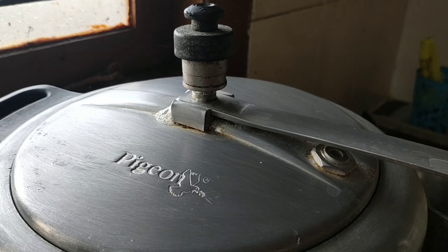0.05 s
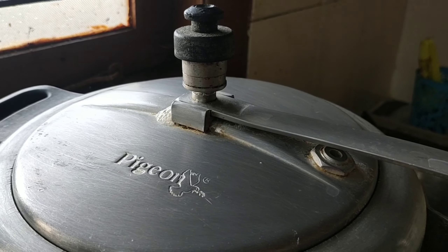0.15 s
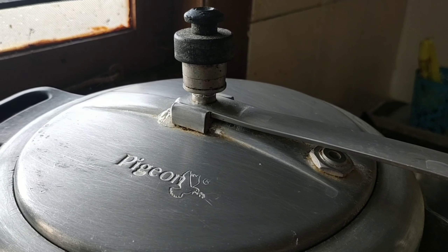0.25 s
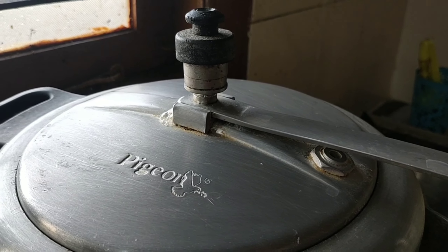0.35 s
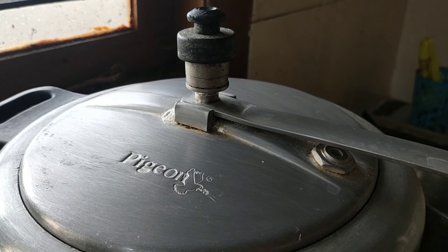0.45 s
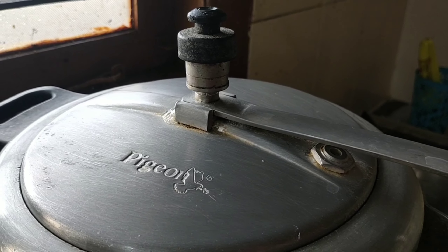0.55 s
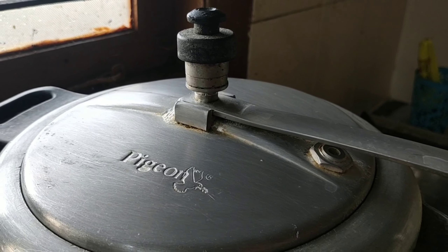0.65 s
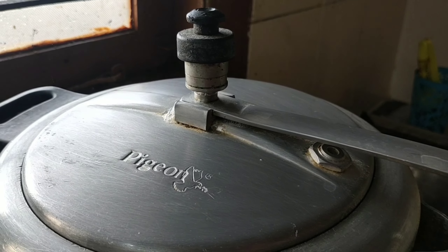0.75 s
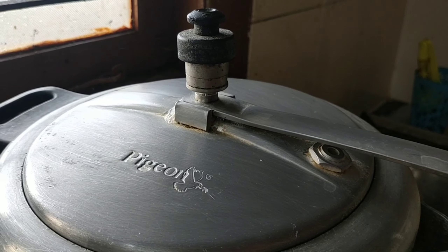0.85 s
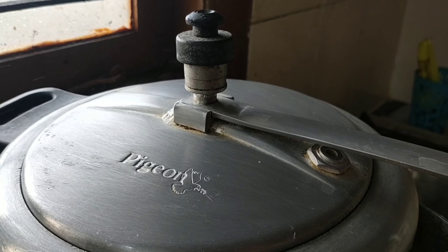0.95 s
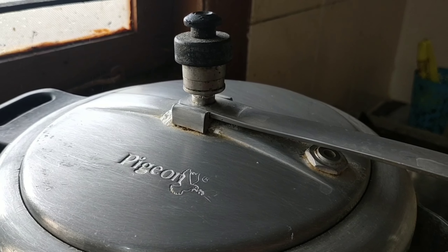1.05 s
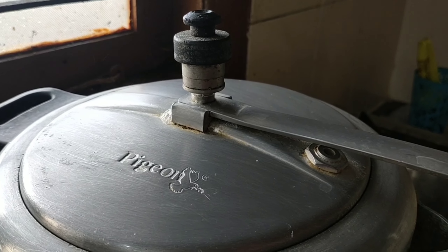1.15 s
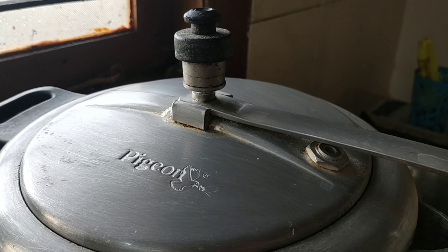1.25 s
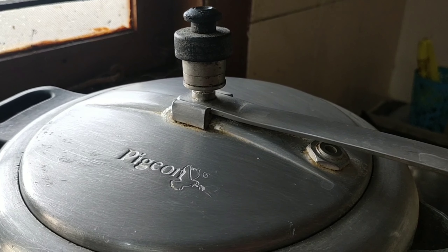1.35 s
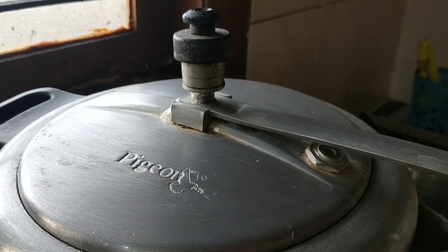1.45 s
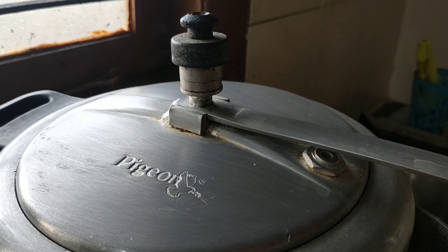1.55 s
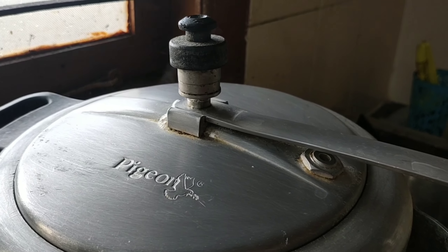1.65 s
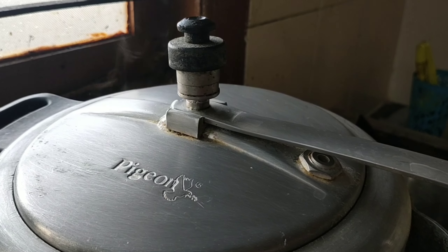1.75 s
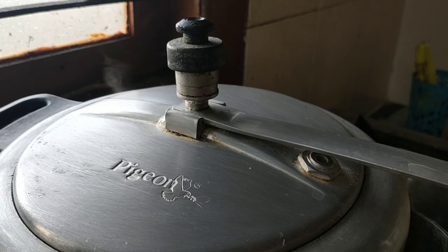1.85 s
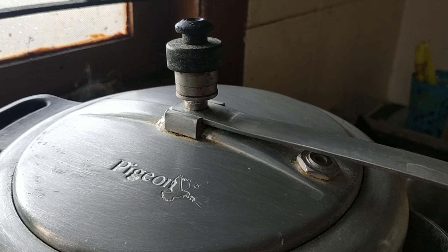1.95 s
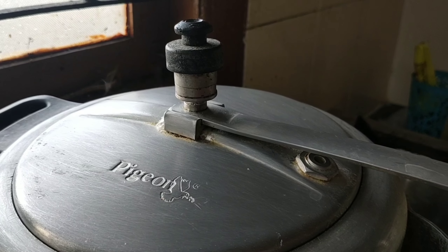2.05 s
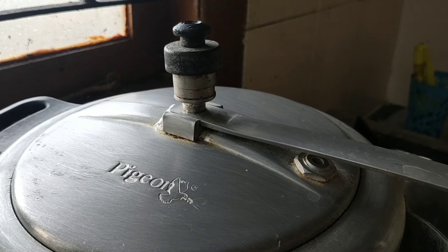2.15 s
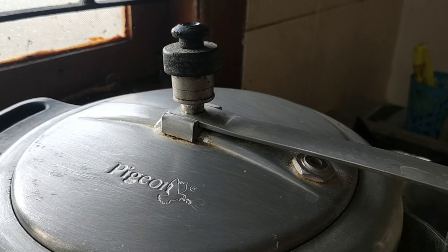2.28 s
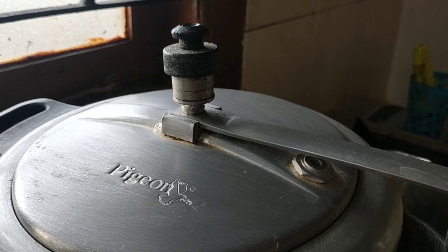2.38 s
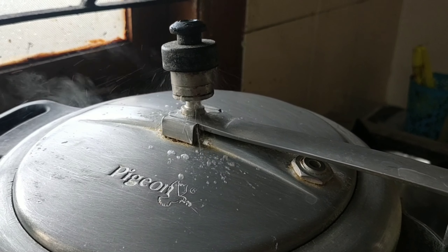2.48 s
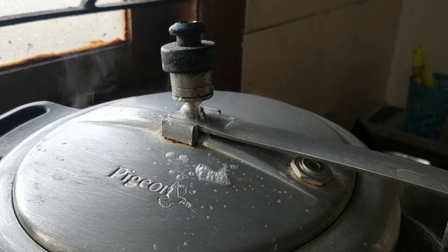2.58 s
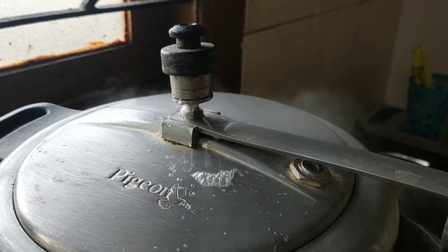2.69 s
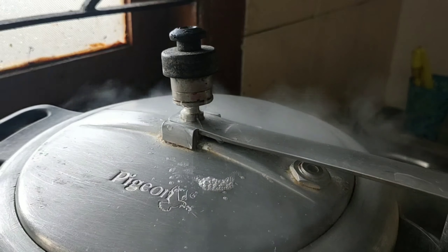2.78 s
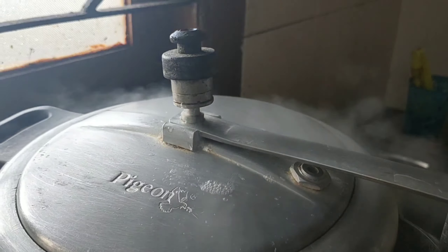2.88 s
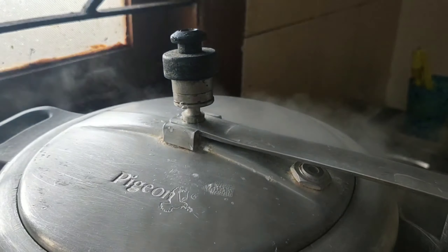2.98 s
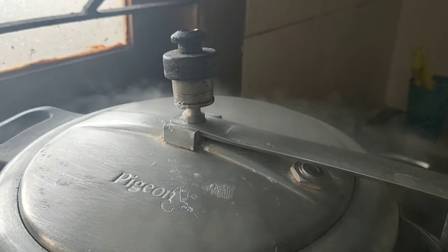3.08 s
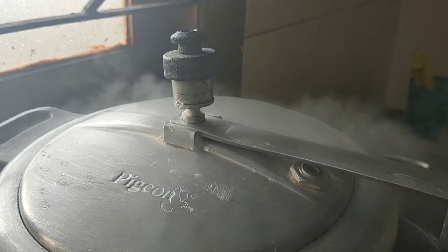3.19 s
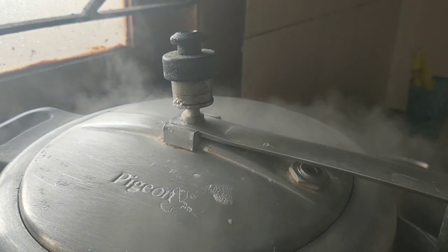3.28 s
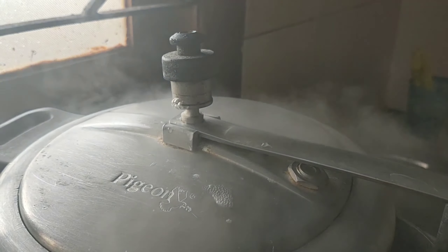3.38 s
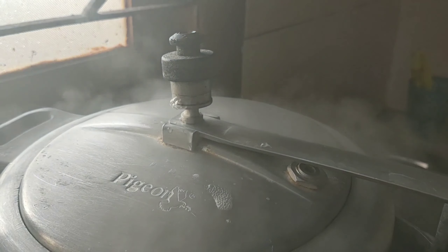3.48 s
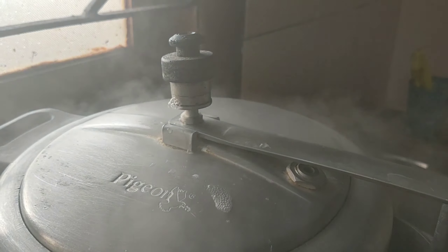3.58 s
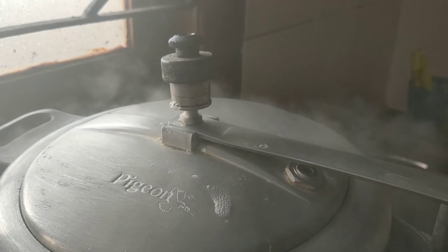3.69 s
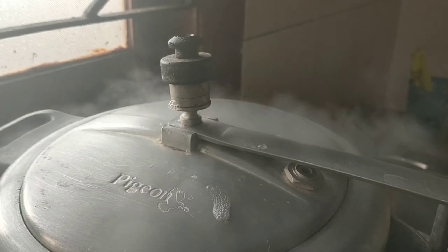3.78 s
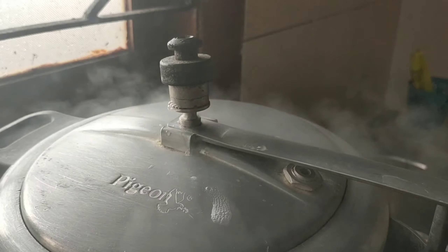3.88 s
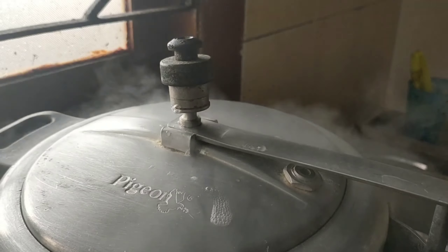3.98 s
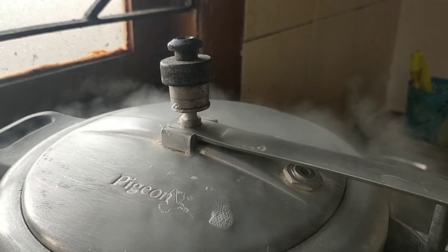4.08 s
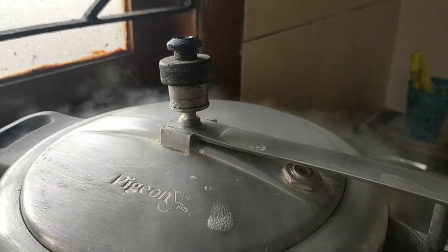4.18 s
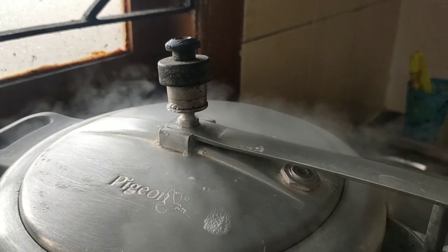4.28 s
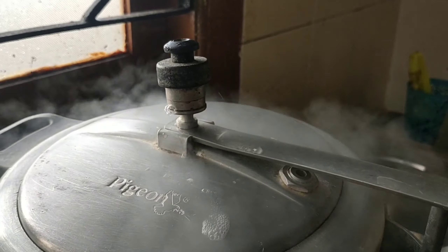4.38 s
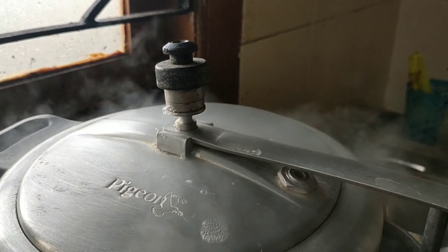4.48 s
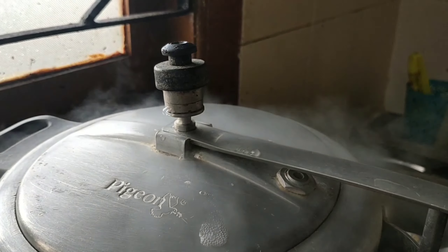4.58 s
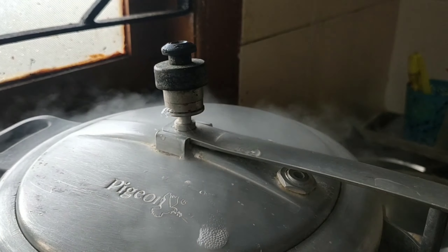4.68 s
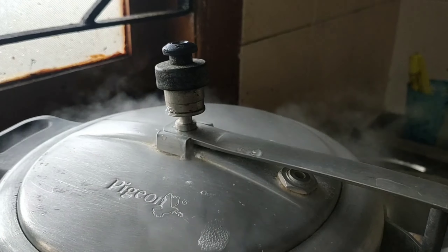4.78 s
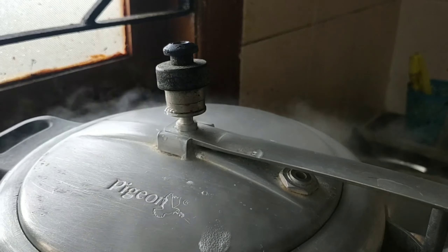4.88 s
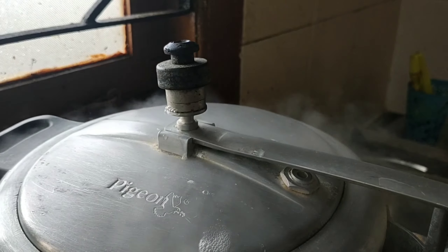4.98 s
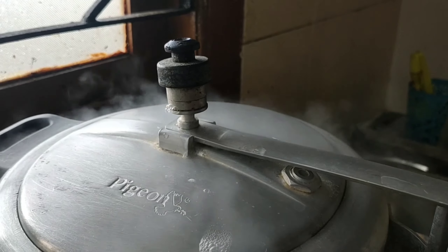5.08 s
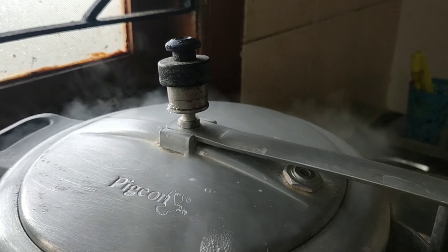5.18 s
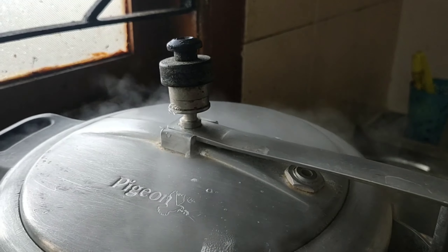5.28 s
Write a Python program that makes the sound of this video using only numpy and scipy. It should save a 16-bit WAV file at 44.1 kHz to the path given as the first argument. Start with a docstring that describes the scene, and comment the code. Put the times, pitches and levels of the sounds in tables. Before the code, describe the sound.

A pressure cooker hisses faintly on a gas stove, then suddenly releases a loud, steady, bright blast of steam.

```python
"""A pressure cooker simmers on a gas ring in a kitchen, over a faint motor hum.
Steam seeps past the weight valve, half whistling and spitting as the pressure grows.
At 2.5 s the weight lifts: a short throaty rush, then a loud, bright, steady jet from the vent.
From 2.6 s the steam cloud reaches the microphone and buffets it with dull pops."""
import sys
import numpy as np
from scipy import signal
from scipy.fft import rfft, irfft, next_fast_len
from scipy.io import wavfile

SR = 44100
rng = np.random.default_rng(int(sys.argv[2]) if len(sys.argv) > 2 else 0)


def inscribe(sig):
    """Save sig as 16-bit PCM at rate SR to the path in sys.argv[1].

    A 1-D sig is mono; a 2-D sig holds one channel per row.
    Samples are clipped to [-1, 1] before scaling.
    """
    pcm = np.round(np.clip(np.atleast_2d(sig).T, -1, 1) * 32767)
    wavfile.write(sys.argv[1], SR, pcm.astype(np.int16))


N = 235641
TIME_S = np.arange(N) / SR
FFT_SIZE = next_fast_len(N, True)
FREQ_HZ = np.maximum(np.arange(FFT_SIZE // 2 + 1) * SR / FFT_SIZE, 1)
OPEN_S, JET_RISE_DB_PER_S = 2.519, 450   # weight fully lifted at OPEN_S


def from_db(db):
    """Decibels to gain."""
    return 10 ** (np.asarray(db) / 20)


def curves(rows):
    """Each column after time, interpolated per sample."""
    times_s, *columns = np.transpose(rows)
    return [np.interp(TIME_S, times_s, column) for column in columns]


def bump(at_s, sigma_s):
    """Gaussian of height 1."""
    return np.exp(-.5 * ((TIME_S - at_s) / sigma_s) ** 2)


def shaped_noise(gain):
    """Noise with a gain per frequency; rms 1."""
    noise = irfft(rfft(rng.standard_normal(FFT_SIZE)) * gain, FFT_SIZE)[:N]
    return noise / np.sqrt(np.mean(noise ** 2) + 1e-20)


def drift(rate_hz):
    """Low-passed random wander; rms 1."""
    return shaped_noise(1 / (1 + (FREQ_HZ / rate_hz) ** 2))


def resonance(centre_hz, width_hz):
    """Lorentzian peak of height 1."""
    return 1 / (1 + (2 * (FREQ_HZ - centre_hz) / width_hz) ** 2)


def turbulence(spectrum, modes=()):
    """Flow noise: broad spectrum plus narrow peaks and notches; rms 1."""
    hz, level_db = np.transpose(spectrum)
    shape_db = np.interp(np.log(FREQ_HZ), np.log(hz), level_db)
    for centre_hz, width_hz, lift_db in modes:
        shape_db += lift_db * resonance(centre_hz, width_hz)
    rolloff = np.minimum(FREQ_HZ / hz.min(), 1) ** 2 * np.minimum(hz.max() / FREQ_HZ, 1) ** 10
    return shaped_noise(from_db(shape_db) * rolloff)


def opening_db(rise_db_per_s):
    """Ramp that reaches 0 dB as the weight lifts."""
    return rise_db_per_s * np.clip(TIME_S - OPEN_S, -1, 0)


# Flame noise: (frequency [Hz], relative level [dB])
FLAME_SPECTRUM = [(25, -28), (50, -18), (85, -14), (180, 1.5), (240, -1), (310, 2), (520, -2.5),
                  (700, -1.5), (1100, 0.5), (2600, -2.5), (3700, 0.5), (4300, -1.5), (4800, -9.5),
                  (6000, -26)]
# Pot resonances and notches: (frequency [Hz], width [Hz], lift [dB])
FLAME_RESONANCES = [(175, 25, 4), (205, 14, 4), (250, 20, -6), (305, 40, 3), (377, 12, 3), (465, 25, 5),
                    (812, 14, 6), (1192, 20, 3), (3640, 60, 3), (4260, 180, 3.5), (4650, 300, -2.5)]


def flame(level_db=-46, flicker_db=.5):
    """Burning gas rushes under the pot."""
    gain = from_db(level_db + flicker_db * drift(rate_hz=5.8))
    return gain * turbulence(FLAME_SPECTRUM, FLAME_RESONANCES)


# Simmer envelope: (time [s], level [dB])
SIMMER_LEVELS = [(0, -56), (.6, -54.5), (1.4, -59), (1.9, -56.5), (5.34, -73)]
# Simmer noise: (frequency [Hz], relative level [dB])
SIMMER_SPECTRUM = [(170, -25), (290, -14), (400, -13), (460, -0.5), (550, -5), (650, -20), (900, -13)]


def simmer(boil_db=1.0):
    """Water simmers in the pot, quieter as the pressure nears its top."""
    level_db, = curves(SIMMER_LEVELS)
    return from_db(level_db + boil_db * drift(rate_hz=23)) * turbulence(SIMMER_SPECTRUM)


# Motor tones: (frequency [Hz], level [dB])
HUM_TONES = [(69.5, -72), (100.3, -60.5), (207.5, -64.5)]


def hum(waver_db=3.7):
    """A household motor hums; each tone wavers separately."""
    return sum(from_db(db + waver_db * drift(rate_hz=4)) * np.sin(2 * np.pi * hz * TIME_S)
               for hz, db in HUM_TONES)


# Leak envelope: (time [s], level [dB])
SEEP_LEVELS = [(0, -40), (.65, -42), (1.5, -38.5), (2.25, -38.5), (2.44, -33), (2.52, -22.5), (2.8, -35)]
# Leak hiss: (frequency [Hz], relative level [dB])
SEEP_SPECTRUM = [(1500, -13.5), (4000, -10), (5000, -10), (5900, -15), (7000, -7), (8400, -1), (9500, -2.5),
                 (10600, -2.5), (12000, 0), (13300, 0.5), (15400, 0)]
# Valve resonances: (frequency [Hz], width [Hz], lift [dB])
SEEP_RESONANCES = [(8700, 180, 5.2), (9930, 150, 1.6), (11700, 120, 2.6), (14700, 110, 2), (15200, 200, 2)]


def seep(flutter_db=0.8):
    """Steam hisses under the weight, growing with pressure and flaring as the seat opens."""
    level_db, = curves(SEEP_LEVELS)
    gain = from_db(level_db + nodding_db() + flutter_db * drift(rate_hz=27))
    return gain * turbulence(SEEP_SPECTRUM, SEEP_RESONANCES)


# Moments when the tone catches: (time [s], sigma [s], level [dB])
WHISTLE_SWELLS = [(0, 0.1, -52), (1.39, 0.036, -52)]


def whistle(level_db=-62.5):
    """Turbulence rings in the weight's narrow bore: a breathy tone until it lifts."""
    seated = 1 - from_db(opening_db(JET_RISE_DB_PER_S))
    swells = sum(from_db(db) * bump(at_s, sigma_s) for at_s, sigma_s, db in WHISTLE_SWELLS)
    tone = shaped_noise(resonance(centre_hz=4095, width_hz=45))
    return (from_db(level_db) * seated + swells) * tone


# Wet bursts: (time [s], sigma [s], level [dB])
SPIT_BURSTS = [(1.293, 0.022, -48), (1.395, 0.018, -47), (1.82, .015, -44.5), (1.96, .015, -57),
               (2.154, 0.038, -40.5)]
# Spit noise: (frequency [Hz], relative level [dB])
SPIT_SPECTRUM = [(600, -11), (2000, -6), (4100, 2), (5700, -7), (8500, -1), (15000, -10)]


def spits():
    """Moisture spits softly through the valve seat."""
    gain = sum(from_db(db) * bump(at_s, sigma_s) for at_s, sigma_s, db in SPIT_BURSTS)
    return gain * turbulence(SPIT_SPECTRUM)


# Nods of the weight: (time [s], sigma [s], level change [dB])
WEIGHT_NODS = [(1.735, .025, -1.7), (2.04, .02, -1.2), (2.13, .022, 3.2), (4.145, .007, -3.5)]


def nodding_db():
    """Flow change as the weight nods, briefly narrowing or widening the gap."""
    return sum(db * bump(at_s, sigma_s) for at_s, sigma_s, db in WEIGHT_NODS)


# Wet steam: (frequency [Hz], relative level [dB])
RUSH_SPECTRUM = [(150, -22), (400, -4), (700, 2.5), (1100, -2.5), (1550, 6), (2100, 0), (3300, 4.5),
                 (4900, 2.5), (5700, -33), (9000, -15)]


def rush(level_db=-33.5, hold_s=.085, fall_db_per_s=97, grain_db=1.0):
    """Condensed water blows out: swells with the jet, holds while the vent clears, dies."""
    fall_db = fall_db_per_s * np.maximum(TIME_S - OPEN_S - hold_s, 0)
    envelope_db = level_db + opening_db(rise_db_per_s=380) - fall_db
    return from_db(envelope_db + grain_db * drift(rate_hz=330)) * turbulence(RUSH_SPECTRUM)


# Jet noise: (frequency [Hz], relative level [dB])
JET_SPECTRUM = [(150, -53), (500, -26), (1300, -26.5), (2100, -20), (3000, -15.5), (4200, -12.5),
                (4700, -15), (5700, -15), (6700, -9.5), (8200, 0), (10400, -0.5), (12000, -4),
                (13500, -1.5), (15400, 0.5)]
# Valve, lid and pot resonances and notches: (frequency [Hz], width [Hz], lift [dB])
JET_RESONANCES = [(2580, 70, 3), (2900, 90, 2.5), (3345, 22, 7), (3480, 40, 3), (3640, 90, 4),
                  (3900, 120, -2), (4110, 60, 4), (4239, 22, 7), (4330, 50, 3), (5180, 50, 3),
                  (5770, 110, -3), (6302, 30, 7), (6560, 100, 4), (7047, 22, 6.5), (7508, 25, 3),
                  (7624, 60, 4), (7807, 28, 3), (8137, 45, 4.5), (8270, 32, 3), (8380, 100, 2),
                  (8749, 28, 3), (9151, 54, 3.5), (9942, 32, 4), (10074, 25, 4), (10438, 50, 3),
                  (11020, 150, 2)]


def jet(level_db=-17.5, onset_db=-1, settle_s=0.15, flutter_db=0.12, grain_db=.5):
    """Steam swells to a steady blast; the weight trembles on it and droplets roughen it."""
    settling_db = onset_db * np.exp(-np.maximum(TIME_S - OPEN_S, 0) / settle_s)
    envelope_db = level_db + opening_db(JET_RISE_DB_PER_S) + settling_db
    gap_db = flutter_db * drift(rate_hz=25) + nodding_db()
    spray_db = grain_db * drift(rate_hz=560)
    return from_db(envelope_db + gap_db + spray_db) * turbulence(JET_SPECTRUM, JET_RESONANCES)


# Draught carrying the cloud: (time [s], eddy rate [1/s], relative level [dB])
DRAUGHT_EDDIES = [(2.6, 0, -37), (2.7, 164, -35.5), (3.1, 260, -37), (3.5, 194, -37), (3.75, 80, -36.5),
                  (5.34, 70, -40.5)]
# Gusts of the cloud: (time [s], relative level [dB], fall time [s], swirl length [s])
GUSTS = [(2.739, -23, 0.00054, 0), (2.7899, -17, 0.00081, .005), (2.8221, -25.5, .0006, 0),
         (2.866, -22, 0.0011, 0), (2.894, -32, .002, 0), (2.9123, -16.5, 0.0011, .018),
         (3.051, -22, .0007, 0.002), (3.0745, -18, 0.0011, .028), (3.1165, -16.5, .0006, 0.00031),
         (3.127, -19, .0009, .016), (3.1845, -26.5, 0.0017, .01), (3.227, -18.5, .0008, .022),
         (3.2718, -25.5, .0006, 0.00029), (3.2894, -22, .0012, .014), (3.3255, -24, .0013, 0),
         (3.3611, -22, 0.00092, 0.00011), (3.41, -20.5, 0.00097, .01), (3.4721, -22.5, .0009, .014),
         (3.51, -17, .0008, .014), (3.657, -20.5, .0013, 0), (3.867, -26, .001, 0.0003),
         (3.9643, -25.5, 0.0014, 0), (3.977, -28, .0009, 0), (4.0966, -20.5, 0.00045, 0.0013),
         (4.533, -23, 0.00098, 0.0011), (4.5776, -26.5, .0007, 0), (4.7776, -24, 0.0011, 0.00021),
         (5.0058, -23.5, 0.0012, 0.00082), (5.13, -23.5, 0.00043, 0.0018)]


def eddies(swirl_per_s=200, swirl_db=-7.5, swirl_spread_db=2, draught_spread_db=5.0, draught_fall_s=.001):
    """Gusts, their weaker swirls and the draught, as (time [s], level [dB], fall time [s])."""
    rows = []
    jitters = rng.uniform(-1, 1, (len(GUSTS), 8, 2))
    for (at_s, db, fall_s, swirl_s), jitter in zip(GUSTS, jitters):
        rows.append((at_s, db, fall_s))
        for k, (shift, size) in enumerate(jitter[:round(swirl_s * swirl_per_s)]):
            eddy_s = at_s - swirl_s / 2 + (k + .5 * shift) / swirl_per_s
            rows.append((eddy_s, db + swirl_db + swirl_spread_db * size, fall_s))
    rate_per_s, draught_db = curves(DRAUGHT_EDDIES)
    sizes_db = draught_db + draught_spread_db * np.clip(rng.standard_normal(N), -2, 1)
    onsets = np.flatnonzero(rng.random(N) < rate_per_s / SR)
    return rows + [(TIME_S[i], sizes_db[i], draught_fall_s) for i in onsets]


def buffeting(gain_db=-0.6, sag_share=0.73, sag_per_fall=1.9, rise_s=0.00011, port_hz=85):
    """Each eddy draws the pressure at the microphone port slowly one way, then snaps it back."""
    half = SR // 100
    t_s = np.arange(-half, half) / SR
    before_s, after_s = np.minimum(t_s, 0), np.maximum(t_s, 0)
    pressure = np.zeros(N + 2 * half)
    for (at_s, db, fall_s), polarity in zip(eddies(), rng.choice([-1, 1], N)):
        sag = np.exp(before_s / (sag_per_fall * fall_s) - after_s / rise_s)
        snap = np.exp(-after_s / max(fall_s, 2 * rise_s)) - np.exp(-after_s / rise_s)
        pulse = snap - sag_share * sag * snap.sum() / sag.sum()   # sag cancels most of the snap's area
        start = round(at_s * SR)
        pressure[start:start + 2 * half] += polarity * from_db(db) * pulse / snap.max()
    port_leak = signal.butter(1, port_hz, "high", fs=SR, output="sos")
    return from_db(gain_db) * signal.sosfilt(port_leak, pressure[half:-half])


def kitchen(direct, count=160, decay_s=0.017, wall_cut_hz=6500, send_db=-9):
    """Short, dull reflections comb the direct sound finely."""
    delay_s = rng.uniform(.002, .06, count)
    strength = rng.choice([-1, 1], count) * np.exp(-delay_s / decay_s)
    echoes = np.bincount((delay_s * SR).astype(int), strength / np.linalg.norm(strength))
    echoes = signal.sosfilt(signal.butter(1, wall_cut_hz, fs=SR, output="sos"), echoes)
    return direct + from_db(send_db) * signal.fftconvolve(direct, echoes)[:N]


def scene():
    """Valve and stove through the room; hum and buffeting direct. Dual mono."""
    valve = kitchen(seep() + spits() + whistle() + jet() + rush())
    stove = kitchen(flame() + simmer())
    mono = valve + stove + hum() + buffeting()
    return np.array([mono, mono])


def record(dry, cutoff_hz=15490):
    """Steep low-pass."""
    taps = signal.firwin(1001, cutoff_hz, window="blackman", fs=SR)
    return signal.fftconvolve(dry, taps[None], "same", axes=1)


dry = scene()
out = record(dry)
inscribe(out)
```